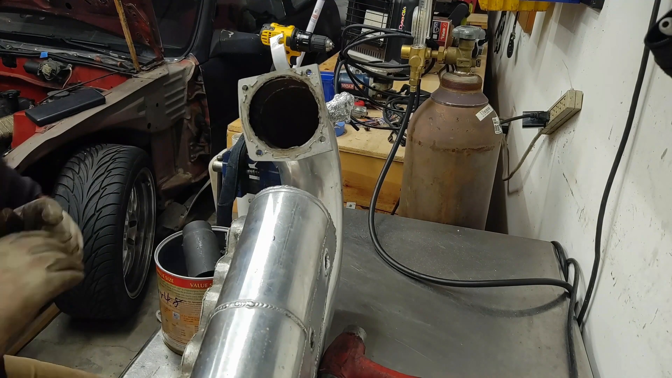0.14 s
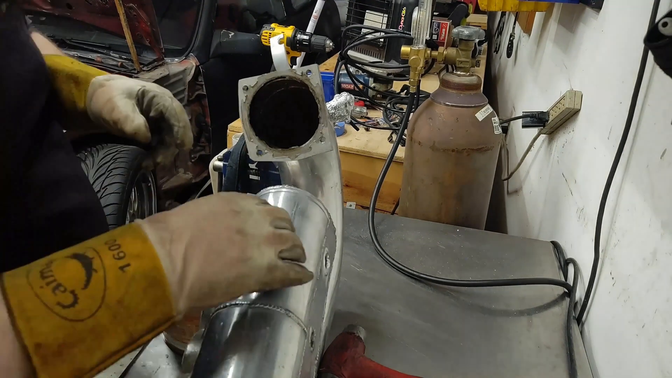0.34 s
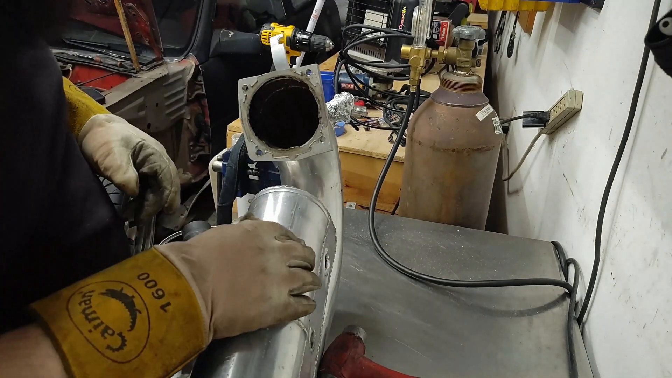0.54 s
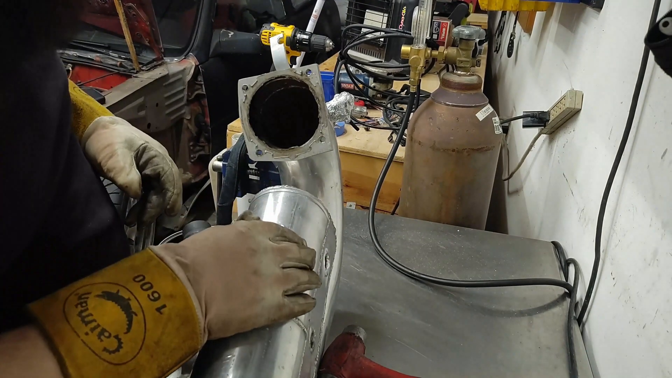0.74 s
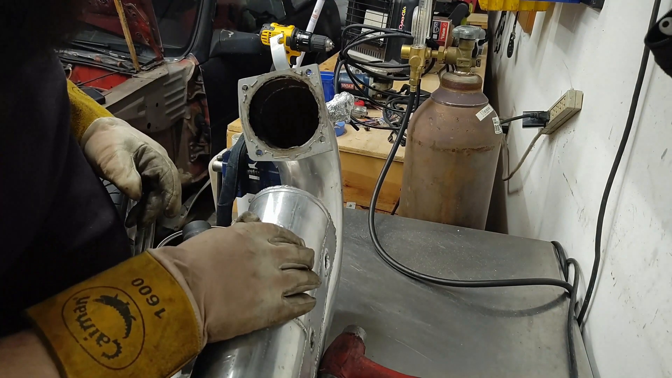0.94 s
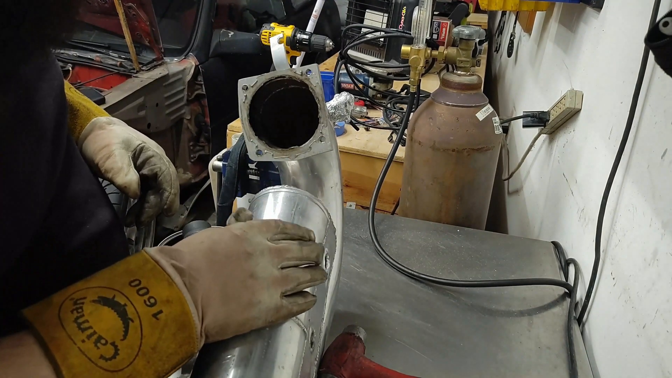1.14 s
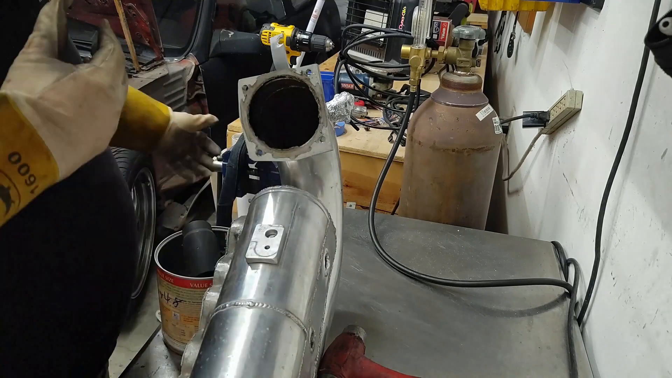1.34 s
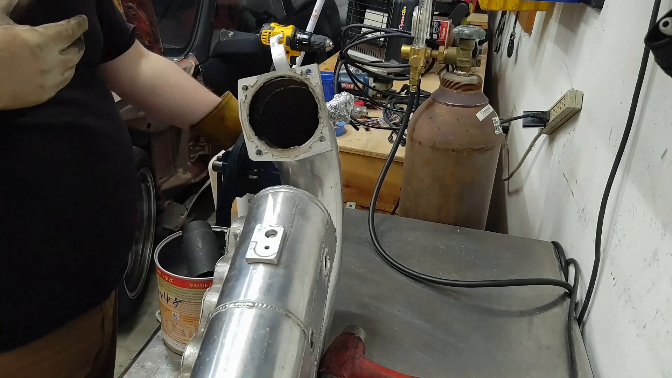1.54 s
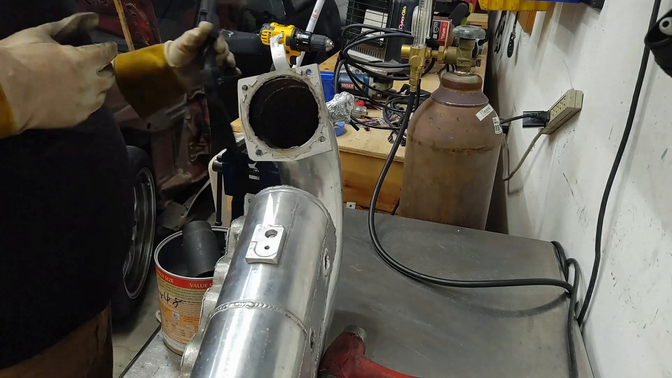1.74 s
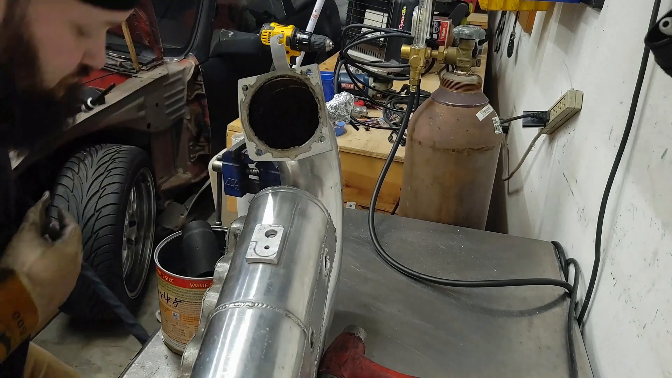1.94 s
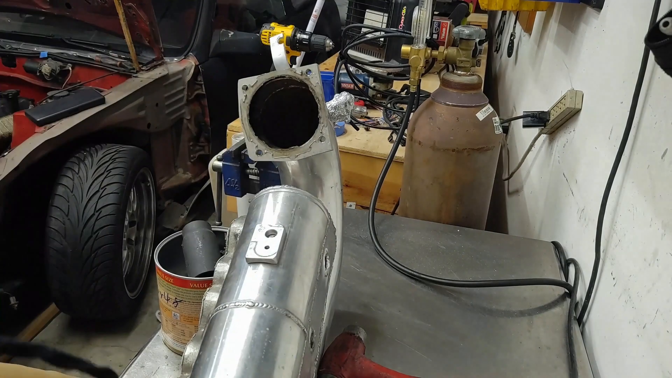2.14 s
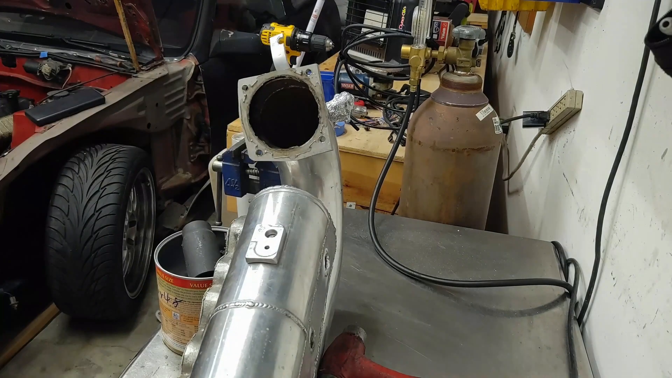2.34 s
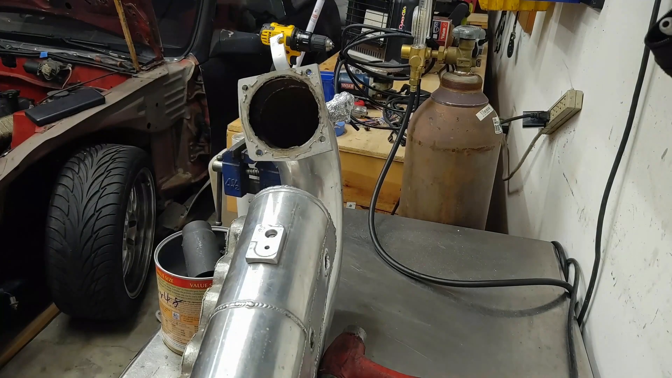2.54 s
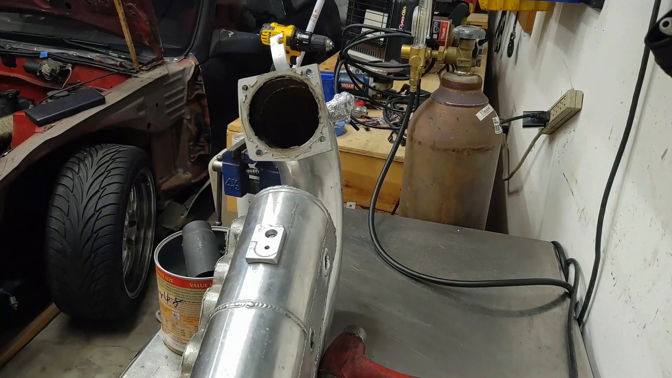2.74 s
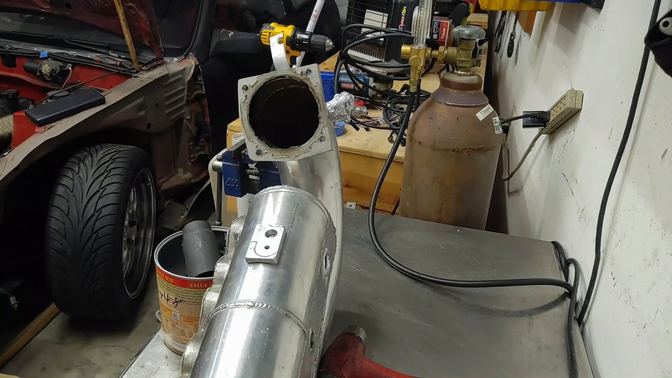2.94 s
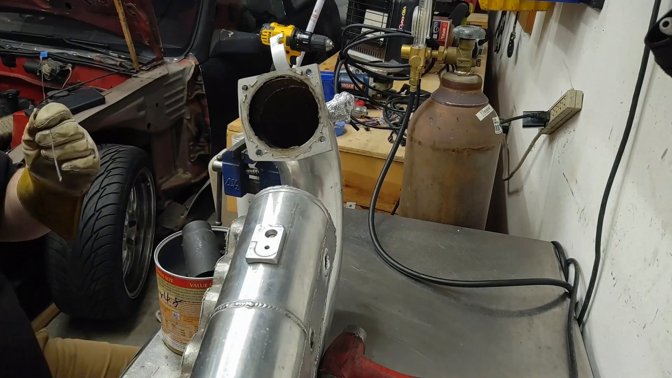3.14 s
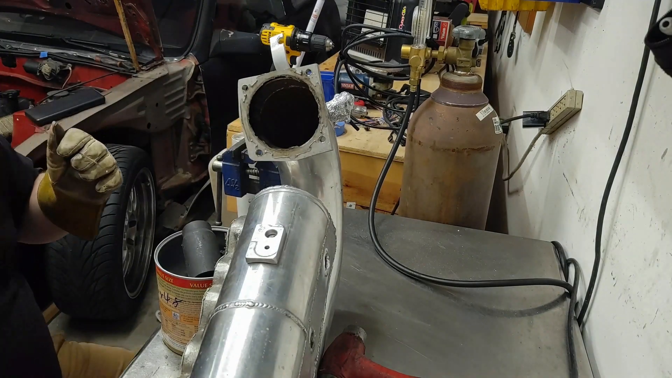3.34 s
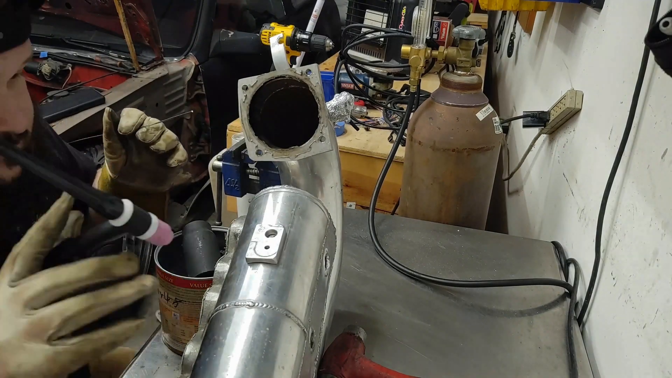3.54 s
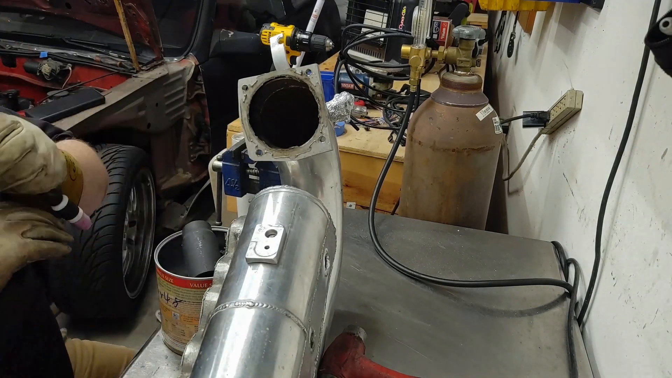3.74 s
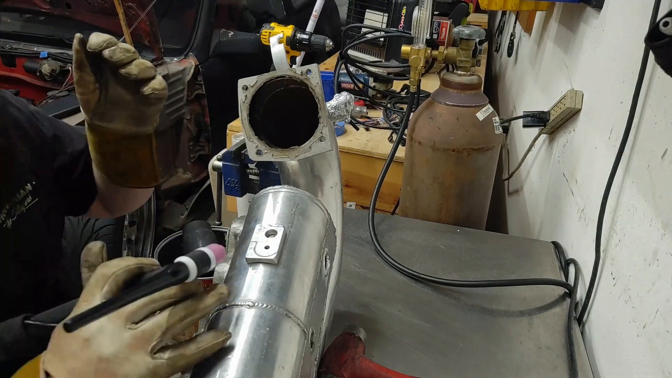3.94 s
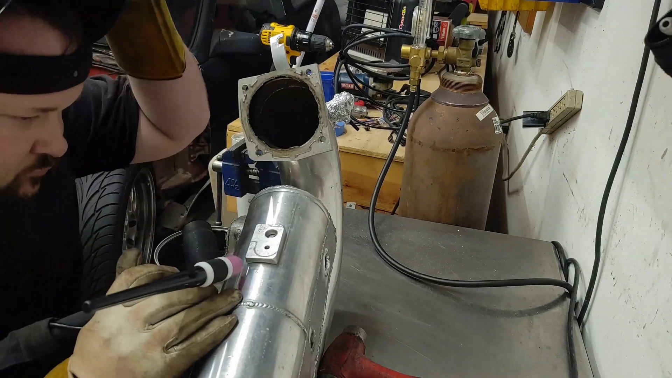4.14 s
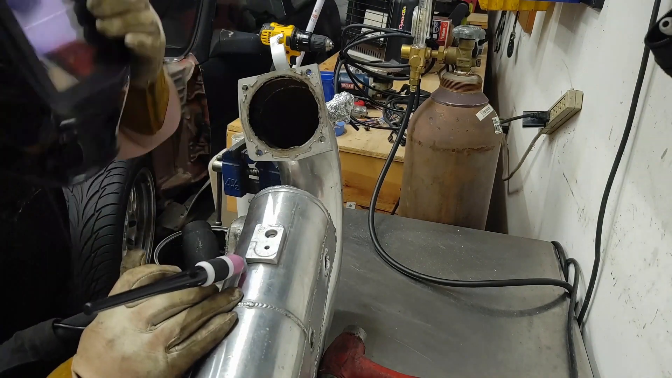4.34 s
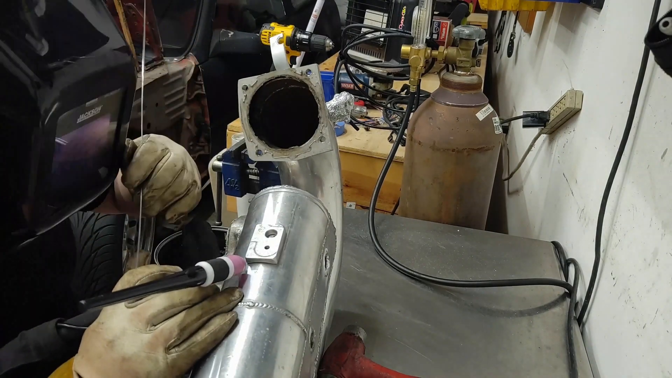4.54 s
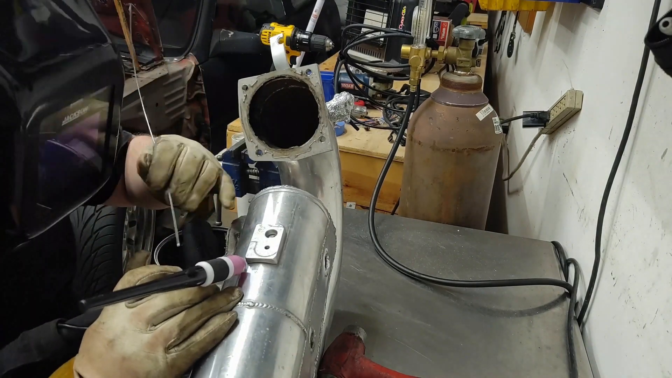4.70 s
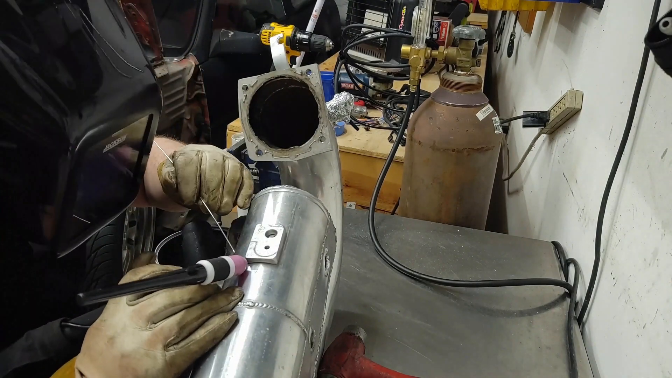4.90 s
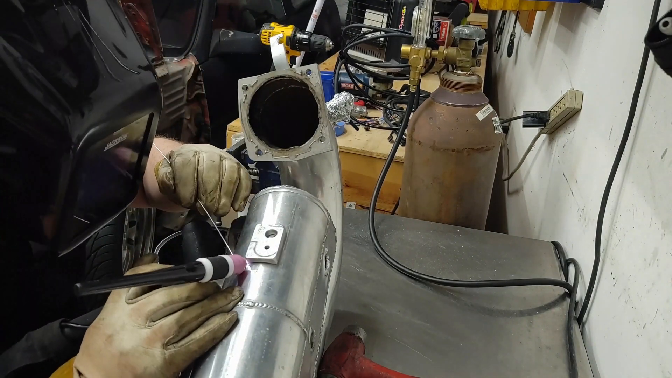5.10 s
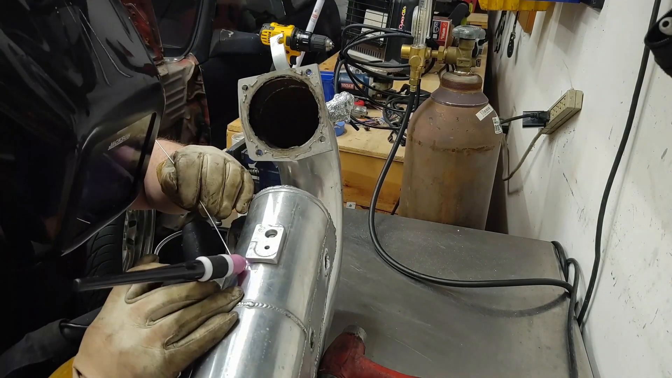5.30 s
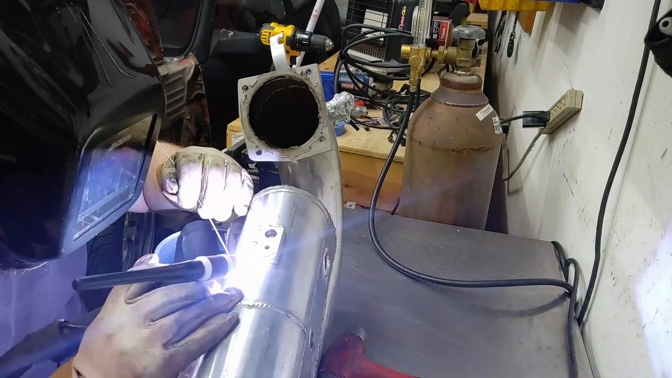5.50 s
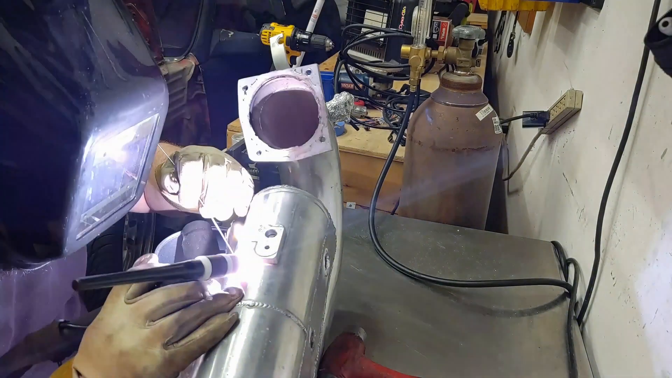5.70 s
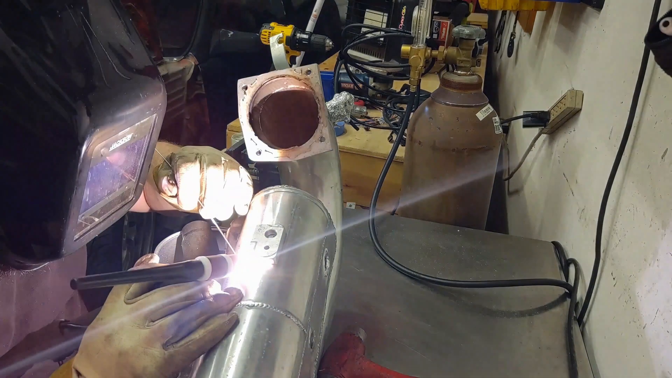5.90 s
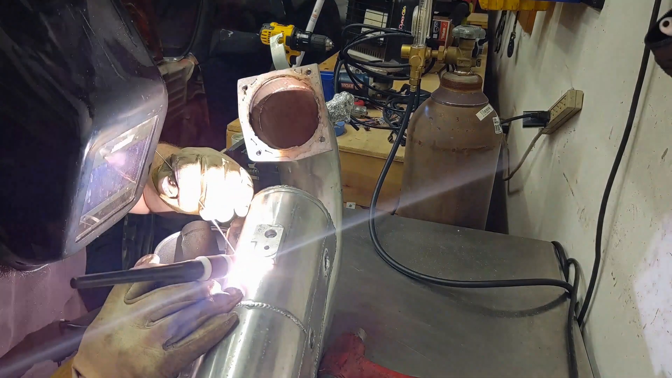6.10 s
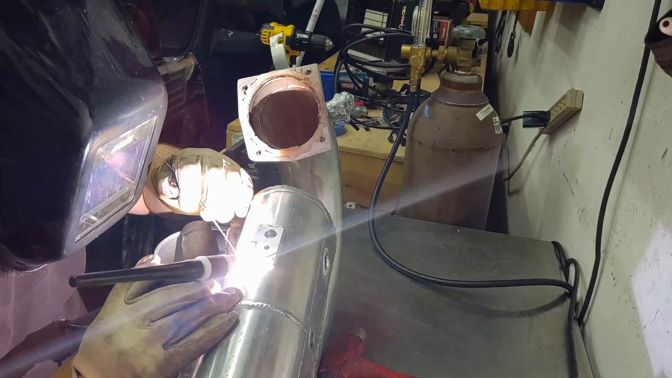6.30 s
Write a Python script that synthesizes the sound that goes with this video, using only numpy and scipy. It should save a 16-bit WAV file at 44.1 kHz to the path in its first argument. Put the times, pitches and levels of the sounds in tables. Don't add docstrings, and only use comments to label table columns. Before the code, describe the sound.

Faint fan noise fills a workshop. Gloved handling brings dry clicks, a brief metallic ring, a cluster of bright jingles and scrapes, and a light bench thud. A sudden bright hiss of gas and starter sparks follows, then popping ignition, a momentary dropout and a harsh, low-pitched electrical buzz with fizzing treble. The microphones are close to the metal pipe, the right side brighter.

```python
import sys
import numpy as np
from scipy import signal
from scipy.fft import rfft, irfft, next_fast_len
from scipy.io import wavfile
from scipy.ndimage import uniform_filter1d, map_coordinates

SR = 44100
rng = np.random.default_rng(int(sys.argv[2]) if len(sys.argv) > 2 else 0)


def master(y):
    cut = np.clip(np.atleast_2d(y).T, -1, 1)
    pcm = np.round(cut * 32767)
    wavfile.write(sys.argv[1], SR, pcm.astype(np.int16))


def linear_from_db(decibels):
    return 10 ** (np.asarray(decibels, float) / 20)


N = 280476

ARC_HZ = 147.39
DUTY = .547

# (frequency [Hz], left [dB], right [dB])
MIC_COLOUR = [(90, -7, 4), (297, 2, 2.5), (1920, 6, 5), (4550, 4, 0.5), (6850, 2, -3.5), (10250, -14.5, 5),
              (15000, 1, 8)]


def evened(x):
    return x / np.sqrt(np.mean(x ** 2, -1, keepdims=True) + 1e-20)


def read(points, hz):
    f, *columns = np.transpose(points)
    return np.array([np.interp(np.log(hz + 1), np.log(f + 1), c) for c in columns])


def play(stages, before):
    knots, last = [], before
    for s, glide_s, *values in stages:
        knots += [(s, *last), (s + glide_s, *values)]
        last = values
    s, *columns = np.transpose(knots)
    return [np.interp(np.arange(N) / SR, np.maximum.accumulate(s), c) for c in columns]


def colour(x, table, extra_db=0):
    size = next_fast_len(N)
    db = read(table, np.fft.rfftfreq(size, 1 / SR)) + extra_db
    return irfft(rfft(x, size) * linear_from_db(db) * np.sqrt(SR / 2), size)[:, :N]


def drift(count, per_s):
    knots = rng.standard_normal((count, 400))
    at = np.meshgrid(np.arange(count), np.arange(0, N / SR, .004) * per_s, indexing="ij")
    return map_coordinates(knots, at, order=3)


def ripple(depth_db, width_hz):
    bins = next_fast_len(N) // 2 + 1
    knots = rng.standard_normal((2, 600))
    at = np.arange(bins) * SR / 2 / bins / width_hz
    return depth_db * np.array([np.interp(at, np.arange(600), k) for k in knots])


def near_noise(direct, echo_s, patchy_db):
    taps = rng.standard_normal((2, 120)) * np.exp(-np.arange(120) / SR / echo_s)
    taps *= rng.random((2, 120)) < .15
    taps[:, 0] = 1.13
    shared = signal.oaconvolve(rng.standard_normal((1, N)), taps, axes=1)[:, :N]
    z = signal.stft(shared, SR, nperseg=512)[2]
    diffuse = signal.stft(rng.standard_normal((2, N)), SR, nperseg=512)[2]
    share = np.clip(direct, 0, 1)
    z = np.sqrt(share) * z / np.sqrt(np.mean(abs(z) ** 2, 2, keepdims=True))
    z = z + np.sqrt(1 - share) * diffuse / np.std(diffuse)
    patches = uniform_filter1d(rng.standard_normal(z.shape), size=2, axis=1)
    patches = uniform_filter1d(patches, size=10, axis=2)
    z = z * linear_from_db(patchy_db * patches / patches.std())
    return evened(signal.istft(z, SR, nperseg=512)[1][:, :N])


def snaps(start_s, steady_db):
    # (frequency [Hz], left [dB], right [dB])
    ordinary = [(295, -60, -52), (440, -63, -54), (590, -49, -56), (740, -47, -53), (890, -52, -55),
                (1900, -48, -52), (3200, -46, -50), (4500, -50, -53), (6500, -49, -53), (8500, -55, -49),
                (10500, -61, -47), (13000, -60, -50), (15500, -56, -54)]
    # (multiple, left [dB], right [dB])
    uneven_harmonics = [(43, -43, -43), (7, -37, -54), (9, -58, -38), (11, -38, -48), (17, -42, -44), (19, -40, -49),
                        (20, -43, -55), (21, -37, -58), (22, -38, -42), (23, -43, -51), (24, -33, -40),
                        (25, -47, -55), (26, -37, -55), (32, -43, -48), (33, -33, -44), (34, -38, -52),
                        (36, -47, -60), (37, -30, -44), (39, -40, -39), (45, -34, -56), (58, -55, -41),
                        (61, -49, -43), (69, -60, -41), (71, -62, -42), (73, -58, -42), (74, -62, -38),
                        (78, -68, -42), (82, -56, -42), (101, -53, -42), (105, -49, -41), (13, -44, -56),
                        (18, -46, -51), (44, -47, -58), (47, -44, -56), (48, -43, -54), (52, -46, -47),
                        (54, -50, -44), (56, -48, -55), (57, -50, -45), (63, -54, -48), (76, -58, -44),
                        (83, -51, -47), (89, -65, -46), (90, -65, -47), (92, -55, -44), (94, -53, -53),
                        (99, -52, -53), (103, -50, -48), (104, -61, -52), (106, -48, -48), (86, -59, -50),
                        (3, -63, -53), (6, -53, -56), (8, -53, -52), (4, -50, -55), (5, -44, -51), (29, -49, -60),
              (41, -46, -49), (28, -45, -63), (40, -50, -54), (60, -55, -55), (62, -72, -44),
              (64, -56, -55), (66, -70, -47), (72, -58, -50), (77, -64, -48), (93, -61, -56),
              (102, -58, -58), (38, -51, -53), (42, -51, -53), (14, -59, -58), (15, -47, -45),
              (16, -56, -56), (27, -51, -55), (30, -47, -45), (31, -51, -50), (35, -53, -47),
              (46, -45, -57), (59, -48, -43)]
    catch_low, catch_high = 0.98, 0.77
    even_s, even_span_s, even_share = 6.12, .08, 0.54

    order = np.arange(2, 107)
    count = len(order)
    scatter = np.clip(rng.standard_normal((2, count)), -2.5, 1)
    level_db = read(ordinary, order * ARC_HZ) + 4.5 * scatter * np.minimum(order / 12, 1)
    for k, left_db, right_db in uneven_harmonics:
        level_db[:, int(k) - 2] = left_db, right_db

    phase = np.angle(1 + .95 * np.exp(-2j * np.pi * order * DUTY))
    phase = phase - .004 * order ** 2 - .7 * np.maximum(order - 14, 0)
    late = np.array([np.interp(order / 7, np.arange(17), k) for k in rng.standard_normal((2, 17))])
    smear = 1.8 * late[0] + np.clip(order / 140, .2, .7) * rng.standard_normal((2, count))
    phase = phase + smear * np.minimum(order / 14, 1)
    phase[1] -= 2 * np.pi * np.maximum(order * ARC_HZ - 3500, 0) * .00049
    phase[1] -= 2 * np.pi * order * ARC_HZ * 6 / SR

    wander = drift(count=2 * count, per_s=20).reshape(2, count, -1)
    strength_db = np.clip(64 + level_db.max(0), 0, 20)[:, None]
    sway = linear_from_db((4.33 - .12 * strength_db) * wander[0])
    sway = sway * np.exp(.45j * wander[1] * np.sqrt(order / 30)[:, None])
    at_s = np.arange(sway.shape[1]) * .004
    loss = np.interp(order, [8, 30], [catch_low, catch_high])[:, None] - 1
    sway *= linear_from_db(loss * np.interp(at_s, np.arange(N) / SR, np.clip(steady_db, -12, 0)))

    start = round(start_s * SR)
    time = np.arange(start, N) / SR
    around_db = uniform_filter1d(level_db, size=5, axis=1)
    evened_db = even_share * np.clip(around_db + 5.5 - level_db, -8, 14) * (order < 48)
    melted = np.clip((time - even_s) / even_span_s, 0, 1)
    buzz = np.zeros((2, N))
    for k, n in enumerate(order):
        waver = np.interp(time, at_s, sway[k].real) + 1j * np.interp(time, at_s, sway[k].imag)
        tone = waver * np.exp(2j * np.pi * n * ARC_HZ * time)
        level = linear_from_db(level_db[:, k, None]) * (1 + melted * (linear_from_db(evened_db[:, k, None]) - 1))
        buzz[:, start:] += np.sqrt(2) * (level * np.exp(1j * phase[:, k, None]) * tone).real
    return buzz


def plasma():
    # (frequency [Hz], left [dB per Hz], right [dB per Hz])
    fizz_spectrum = [(60, -89, -78), (220, -76, -75), (600, -77, -79), (1400, -76, -79), (2150, -81, -83),
                     (2600, -76, -81), (3400, -72, -80), (4200, -74, -79), (5500, -70, -76),
                     (7000, -73, -78), (8800, -78, -73), (10500, -81, -70), (13000, -80, -69),
                     (14500, -79, -76), (15700, -75, -72)]
    cycle = np.arange(N) / SR * ARC_HZ % 1
    flare = 0.3 + .5 * (np.exp(-cycle / 0.14) + np.exp(-((cycle - DUTY) % 1) / 0.075))
    noise = evened(near_noise(0.28, 0.00093, patchy_db=4.5) * flare)
    return colour(noise, fizz_spectrum, ripple(2.2, 199.4) + 3.0)


def puffs(steady_db):
    # (time [s], level [dB])
    gusts = [(5.6, -37.5), (5.817, -41), (5.925, -40), (5.985, -44), (6.124, -41), (6.31, -45.5)]
    rise_db_per_s, fall_db_per_s = 430, 280
    time = np.arange(N) / SR
    since = time - np.array(gusts)[:, :1]
    slope_db = np.maximum(-rise_db_per_s * since, fall_db_per_s * since)
    puff_db = np.max(np.array(gusts)[:, 1:] - slope_db, 0)
    band = signal.butter(3, [70, 170], "band", fs=SR, output="sos")
    buffet = signal.sosfilt(band, rng.standard_normal((2, N)))
    hum = sum(np.sqrt(2) * linear_from_db(db) * np.sin(2 * np.pi * (k + 1) * ARC_HZ * time)
              for k, db in enumerate([0, -9, -6])) * linear_from_db(steady_db)
    return linear_from_db(puff_db + np.c_[[-8, 4]]) * (0.76 * hum + 0.26 * evened(buffet))


def arc():
    # (time [s], glide [s], plasma noise [dB], steadiness of the buzz [dB])
    arc_states = [
        (5.575, 0.0083, 0.5, -3),
        (5.607, 0.005, -1.5, -18.5),
        (5.638, 0.0093, -15.5, -35),
        (5.668, 0.0079, 2.5, -7.5),
        (5.704, 0.0088, -2.5, -1),
        (5.736, 0.0036, 0.5, -0.5),
        (5.77, 0.21, -2.5, 1.5),
        (6.2, 0.1, -1, -1.5),
    ]
    noise_db, steady_db = play(arc_states, before=(-41, -2))
    buzz = snaps(arc_states[0][0], steady_db)
    lit = linear_from_db(noise_db) * plasma() + linear_from_db(noise_db + steady_db) * buzz + puffs(steady_db)
    alight = noise_db > -39.5
    return signal.sosfilt(signal.butter(3, 70, "high", fs=SR, output="sos"), lit * alight)


def gas():
    # (frequency [Hz], left [dB per Hz], right [dB per Hz])
    hiss_spectrum = [(40, -90, -84.5), (188, -77.5, -67.5), (755, -74.5, -70.5), (1390, -72, -60.5),
                     (2020, -75, -65), (3300, -72, -65), (4800, -69, -62.5), (6060, -61.5, -65),
                     (6900, -67.5, -79.5), (8300, -71.5, -68.5), (10200, -70.5, -69), (12000, -72.5, -66.5),
                     (14200, -67, -68.5), (15700, -72, -67)]
    # (frequency [Hz], width [Hz], left [dB], right [dB])
    resonances = [(5300, 77, 8, -16), (1290, 360, 1.5, 1.5), (1980, 320, -1, -2), (7050, 100, -5, 9),
                  (9370, 200, 6.5, 4), (10830, 190, -12, 9), (11230, 150, -2, 6), (12820, 390, -6, 10.5),
                  (13470, 250, 0, 6.5), (15000, 250, 2, 6)]
    valve_s, open_s = 4.9965, 0.0072
    handover_s, shut_s = 5.575, 0.033
    fill_db, fill_s = -7, 0.054

    hz = np.fft.rfftfreq(next_fast_len(N), 1 / SR)
    bumps_db = sum(np.c_[[left, right]] * np.exp(-((hz - f) / w) ** 2) for f, w, left, right in resonances)
    jet = colour(near_noise(0.32, 0.0013, patchy_db=1.7), hiss_spectrum, bumps_db + ripple(1.75, 89.3))
    flutter_db = 0.8 * evened(uniform_filter1d(rng.standard_normal(N), 500))
    t = np.arange(N) / SR
    flow = np.clip(np.minimum((t - valve_s) / open_s, 1 - (t - handover_s) / shut_s), 0, 1) ** 2
    body_db = fill_db * np.exp(-((t - valve_s) / fill_s) ** 2)
    band = signal.butter(2, [1000, 7000], "band", fs=SR, output="sos")
    body = signal.sosfiltfilt(band, jet)
    return flow * linear_from_db(flutter_db - 0.45) * (jet + (linear_from_db(body_db) - 1) * body)


def damped(length_s, t60_s):
    t = np.arange(round(length_s * SR)) / SR
    edges = np.minimum(t / (0.00042 + 0.037 * length_s), (length_s - t) / 0.0013)
    return t, linear_from_db(-60 * t / t60_s) * np.minimum(edges, 1)


def contacts():
    # (time [s], length [s], level [dB], centre [Hz])
    ticks = [(.583, 0.0079, -26, 7000), (.5835, 0.007, -32, 3000), (0.58, 0.0044, -42, 11800),
             (1.623, .004, -40.5, 12400), (1.804, .008, -61, 9500), (2.415, .008, -63, 10500),
             (2.628, 0.0046, -31.5, 8300), (2.657, .005, -33, 11000), (2.658, 0.0043, -35, 9000),
             (2.7355, 0.003, -27.5, 11700), (5.702, .003, -32, 1500), (2.629, 0.033, -44.5, 5900),
             (2.751, 0.012, -54, 6030), (3.113, 0.038, -49, 1910)]
    # (time [s], length [s], level [dB])
    scuffs = [(1.61, 0.046, -62), (2.038, 0.29, -70), (2.423, 0.046, -57.5), (2.488, .019, -54),
              (2.536, 0.051, -50.5), (2.594, 0.033, -56), (2.629, 0.07, -41.5), (2.7, .03, -69),
              (2.735, 0.029, -39.5), (3.084, 0.045, -60), (3.113, 0.069, -42.5), (3.183, .07, -60.5),
              (3.6, .03, -68), (3.79, .02, -70)]
    # (time [s], length [s], level [dB], centre
    # [Hz])
    pops = [(5.01, 0.37, -54, 86), (5.357, 0.2, -58, 90), (5.597, 0.0055, -30, 900),
            (5.604, .005, -29, 900), (5.642, 0.025, -31.5, 250), (5.672, 0.0044, -30, 890),
            (5.682, 0.0085, -27.5, 1210), (5.69, 0.0056, -30, 800), (5.7, .005, -28, 900),
            (3.149, 0.032, -54, 240), (6.289, 0.045, -38.5, 92)]
    # (time [s], length [s], level [dB], tilt [dB per octave])
    knocks = [
        (0.589, 0.036, -56.5, 6),
        (1.613, 0.04, -58, -5),
        (2.25, 1, -71.5, -1.2),
        (2.625, 0.083, -59, -1),
        (2.745, 0.032, -71, 3.5),
        (3.112, 0.029, -52.5, -1.5),
        (3.14, 0.035, -59, 2),
        (3.217, 0.036, -66, 0.5),
    ]
    # (frequency [Hz], width [Hz], level [dB])
    bench = [(320, 210, 1.5), (820, 640, 1), (2210, 1130, 1), (4900, 4500, -3)]
    fade_lengths, knock_lengths = 6.9, 4.7

    touches = [(s, d, db, fade_lengths * d, f, 0.5 * f) for s, d, db, f in ticks]
    touches += [(s, d, db, fade_lengths * d, 10000, 5100) for s, d, db in scuffs]
    touches += [(s, d, db, fade_lengths * d, f, 0.53 * f) for s, d, db, f in pops]
    touches += [(s, d, db + lift_db + tilt * np.log2(f / 1000), knock_lengths * d, f, w)
                for s, d, db, tilt in knocks for f, w, lift_db in bench]

    out = np.zeros((2, N))
    noise = rng.standard_normal((len(touches), 3, 16384))
    hz = np.fft.rfftfreq(16384, 1 / SR)
    to_mics = linear_from_db(read(MIC_COLOUR, hz)) * np.exp(-2j * np.pi * hz / SR * np.c_[[0, 7]])
    for (s, length_s, db, t60_s, centre_hz, width_hz), (a, b, c) in zip(touches, noise):
        shape = hz / (hz + 0.11 * centre_hz) / (1 + (2 * (hz - centre_hz) / width_hz) ** 4) ** .5
        burst = evened(irfft(rfft(a) * shape)) + 1.41 * evened(irfft(rfft([b, c]) * shape))
        burst *= 0.61 * linear_from_db(2.85 * evened(uniform_filter1d(a[::-1], size=90)))
        t, fade = damped(min(length_s, .37), t60_s)
        burst = irfft(rfft(burst) * to_mics)[:, :len(t)]
        out[:, round(s * SR):][:, :len(t)] += linear_from_db(db - 4.0) * fade * burst
    return out


def rings():
    # (frequency [Hz], level [dB])
    part_modes = [(1680, 2), (2200, -4), (2530, -6), (3150, -10), (3640, -16.5), (3880, 2.5), (4720, -15),
                  (5373, 1), (6200, -13)]
    # (time [s], length [s], level [dB], most excited [Hz], reach [octaves])
    part_hits = [
        (0.49, 0.033, -51, 3150, 0.04),
        (0.44, .018, -69, 2200, .04),
        (.491, .008, -56, 3640, .02),
        (3.153, .022, -60.5, 2530, .05),
        (.586, 0.034, -54, 3500, 0.55),
        (3.858, .015, -76, 2480, 0.13),
    ]
    # (frequency [Hz], level [dB])
    bit_modes = [(3450, -6), (5500, -5), (6200, -15), (7700, 1), (8360, -0.5), (9500, -8), (9900, -6),
                 (10300, -8), (11300, -4), (13800, -17)]
    # (time [s], length [s], level [dB], most excited [Hz], reach [octaves])
    bit_hits = [(1.621, 0.012, -45, 9500, 0.028), (2.252, 0.043, -68.5, 7700, 0.089),
                (2.487, 0.024, -54, 10600, 0.12), (2.485, 0.026, -64, 3450, 0.22),
                (2.534, 0.11, -69, 3450, .2), (2.655, 0.019, -49.5, 3450, .15), (2.4, .02, -59, 5600, 0.1),
                (2.665, .05, -59, 5500, .05), (2.634, 0.052, -45, 7700, 0.044),
                (2.537, 0.036, -53.5, 8000, 0.12), (2.541, 0.026, -54, 9900, 0.045),
                (2.554, .02, -56, 11300, .05), (2.604, 0.035, -56, 11300, 0.19),
                (2.629, 0.009, -41, 11300, 0.1), (2.64, 0.019, -34.5, 10000, 0.06),
                (2.656, 0.045, -37.5, 8360, 0.04), (2.66, .004, -34, 8360, .1),
                (2.655, 0.013, -41, 11500, .1), (2.697, 0.035, -57, 8360, 0.11)]

    hits = [(*hit, part_modes) for hit in part_hits] + [(*hit, bit_modes) for hit in bit_hits]
    modes_hit = []
    for s, length_s, db, top_hz, reach, modes in hits:
        for f, mode_db in modes:
            mode_db = db + mode_db - 6 * abs(np.log2(f / top_hz) / reach)
            modes_hit.append((s, length_s, f, mode_db, 8.4 * length_s))

    out = np.zeros((2, N))
    chance = rng.standard_normal((len(modes_hit), 2, 16))
    for (s, length_s, ring_hz, db, t60_s), wobble in zip(modes_hit, chance):
        t, fade = damped(length_s, t60_s)
        beat = np.array([np.interp(t / 0.0071, np.arange(16), w) for w in wobble])
        tone = np.sin(2 * np.pi * ring_hz * t + 3 * wobble[:, :1] + .9 * beat[::-1])
        level_db = db + 6 + read(MIC_COLOUR, ring_hz)[:, None] + 2.4 * beat
        out[:, round(s * SR):][:, :len(t)] += linear_from_db(level_db) * fade * tone
    return out


def garage():
    # (frequency [Hz], left [dB per Hz], right [dB per Hz])
    room_spectrum = [(31.4, -108, -108), (86, -98, -99.5), (160.5, -94, -93), (219.6, -79.5, -79),
                     (338, -85, -83), (472, -92.5, -94), (662, -86, -93), (1026, -95.5, -96),
                     (2310, -102, -103), (4380, -106, -108), (7000, -113, -112), (10000, -124, -111),
                     (12700, -126, -116), (15800, -128, -124)]
    # (frequency [Hz], likeness [0-1])
    likeness = [(60, 0.72), (200, 1), (450, 0.69), (900, 0.14), (1500, 0.41), (2500, 0.066), (5000, 0.11),
                (15000, .1)]
    # (frequency [Hz], left [dB], right [dB])
    motor_lines = [(232, -66, -68), (1366, -99, -79), (15068, -104, -87), (15294, -93, -81),
                   (15520, -104, -82), (15735, -108, -102)]
    rustle_db, busy_s, busy_span_s, busy_db = 1.3, 2.66, 0.66, 2

    hz, _, z = signal.stft(rng.standard_normal((2, N)), SR, nperseg=1024)
    same = np.clip(read(likeness, hz)[0], -1, 1)[:, None]
    lead = np.exp(2j * np.pi * hz * 10 / SR)[:, None]
    z[1] = same * lead * z[0] + np.sqrt(1 - same ** 2) * z[1]
    patches = uniform_filter1d(uniform_filter1d(rng.standard_normal(z.shape[1:]), 9, 0), 5, 1)
    z = z * linear_from_db(1.67 * patches / patches.std())
    noise = evened(signal.istft(z, SR, nperseg=1024)[1][:, :N])
    fan = colour(noise, room_spectrum)

    time = np.arange(N) / SR
    sway = drift(count=2 * len(motor_lines), per_s=13)
    sway = [np.interp(time, np.arange(len(s)) * .004, s) for s in sway]
    lines = np.zeros((2, N))
    for k, (f, left_db, right_db) in enumerate(motor_lines):
        sway_db, sway_rad = (4.4, .6) if f < 5000 else (1.5, .25)
        level_db = np.c_[[left_db, right_db]] + sway_db * sway[2 * k]
        lines += linear_from_db(level_db) * np.sqrt(2) * np.sin(2 * np.pi * f * time + sway_rad * sway[2 * k + 1])

    lift_db = rustle_db + busy_db * np.exp(-((time - busy_s) / busy_span_s) ** 2)
    treble = signal.sosfilt(signal.butter(2, 5000, "high", fs=SR, output="sos"), fan)
    return fan + treble * (linear_from_db(lift_db) - 1) + lines


def scene():
    return garage() + gas() + arc() + contacts() + rings()


def top_cut(x):
    return signal.sosfilt(signal.butter(12, 16930, fs=SR, output="sos"), x)


def record(dry):
    edge = signal.firwin(1023, 15740, window=("kaiser", 9), fs=SR)
    mix = signal.oaconvolve(dry, edge[None], "same", axes=1)
    return top_cut(mix)


dry = scene()
out = record(dry)
master(out)
```